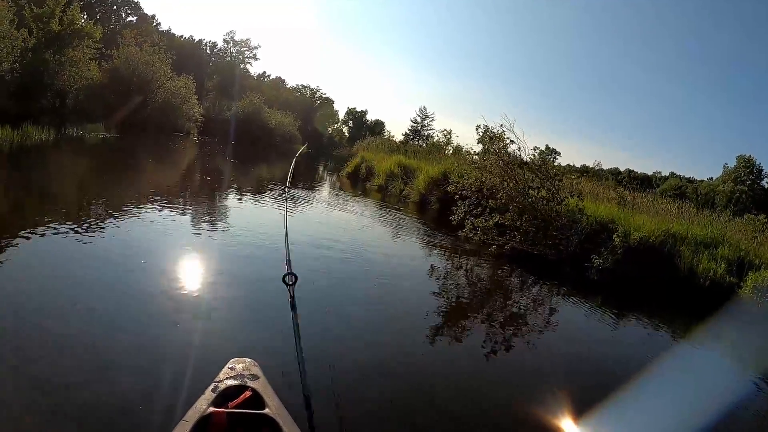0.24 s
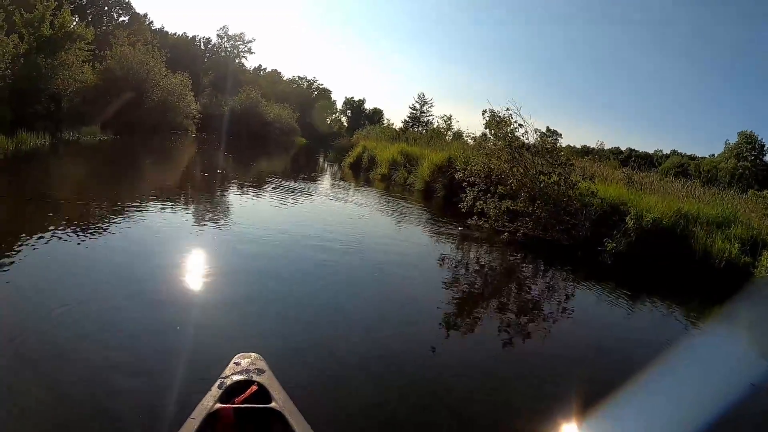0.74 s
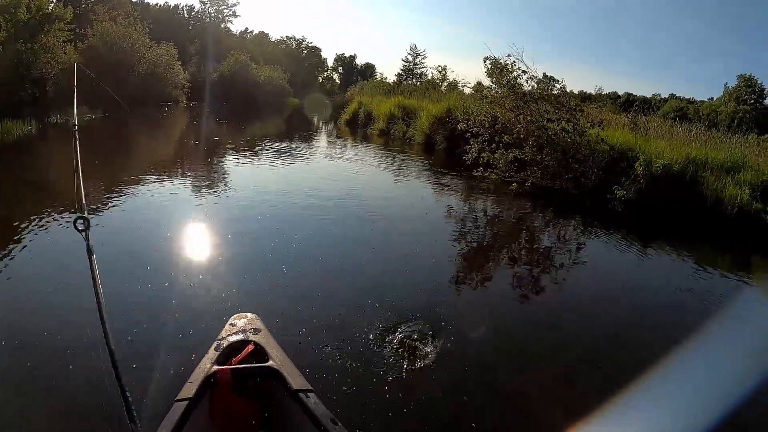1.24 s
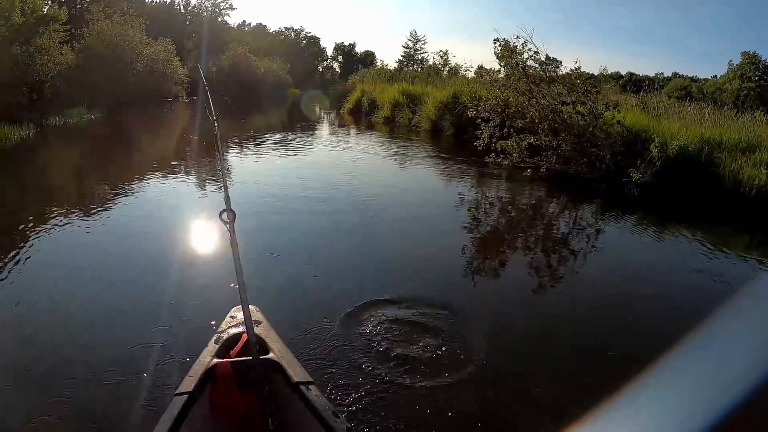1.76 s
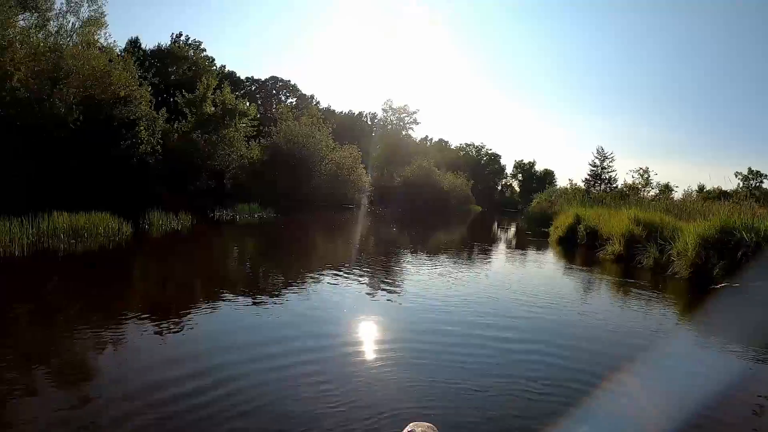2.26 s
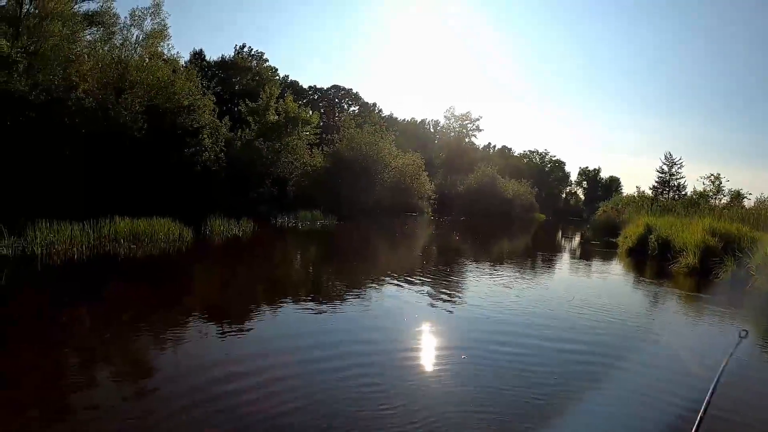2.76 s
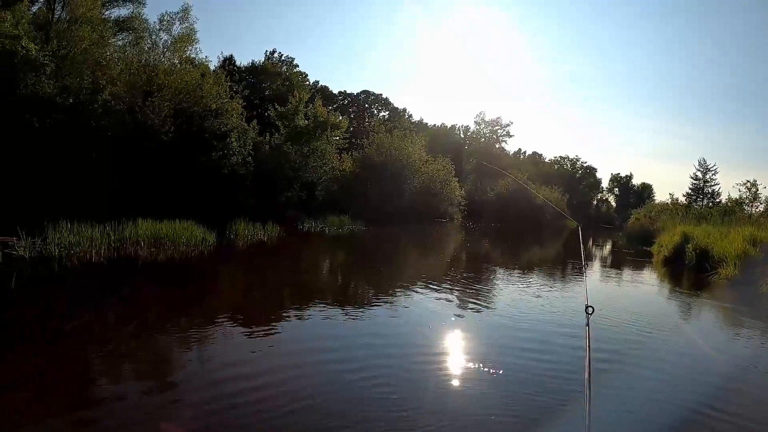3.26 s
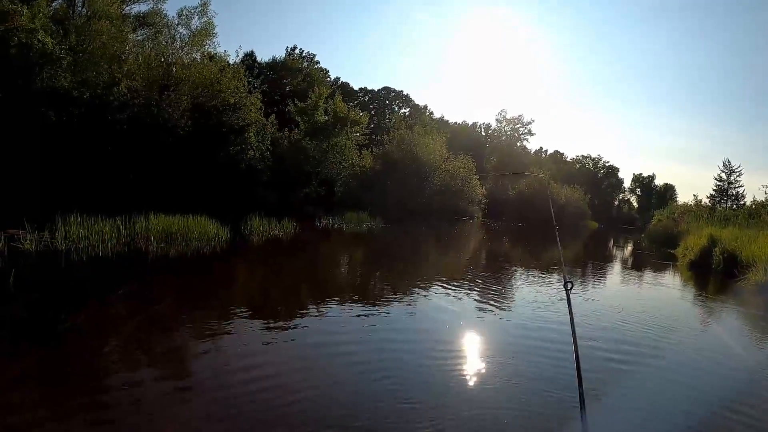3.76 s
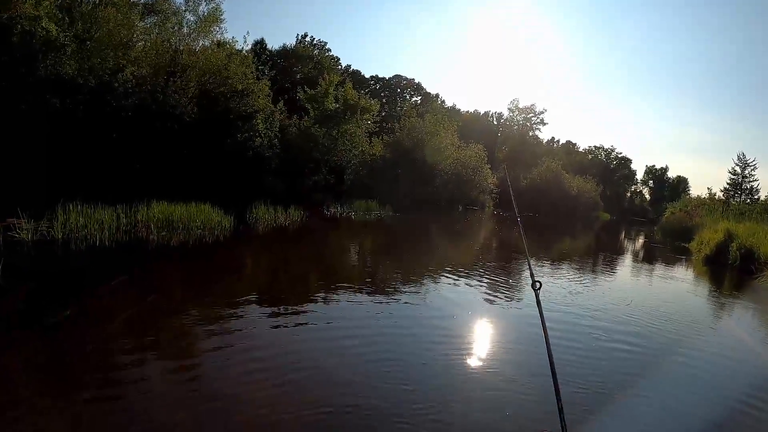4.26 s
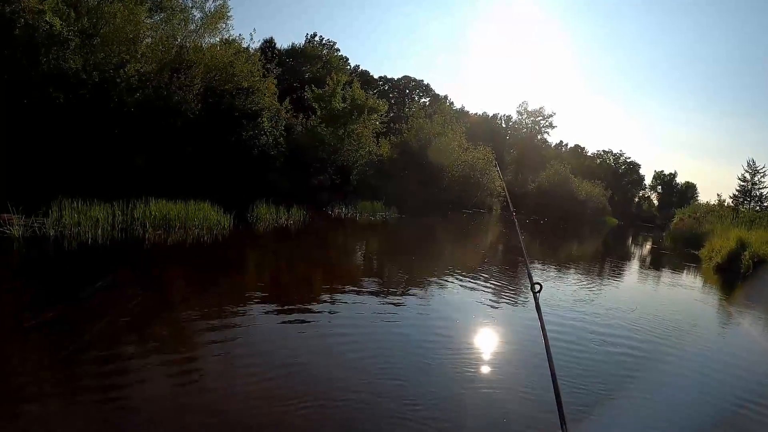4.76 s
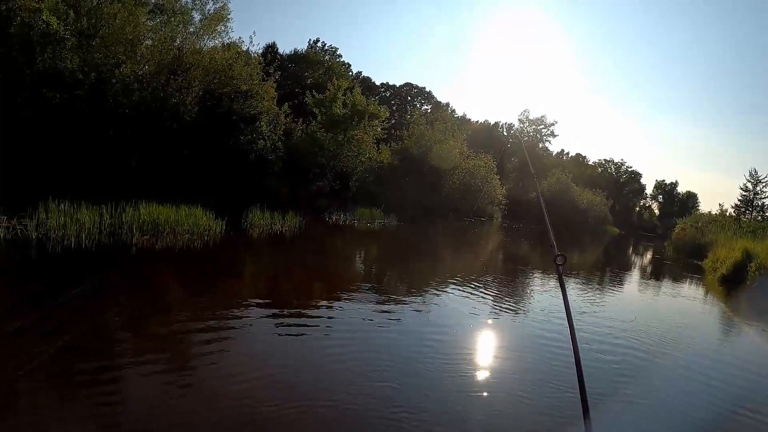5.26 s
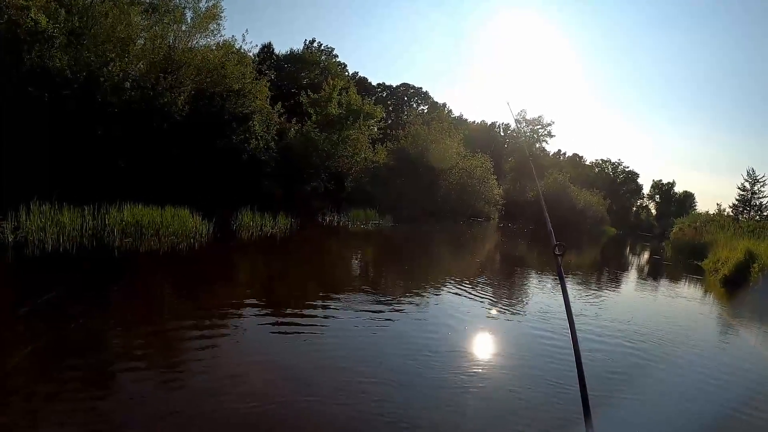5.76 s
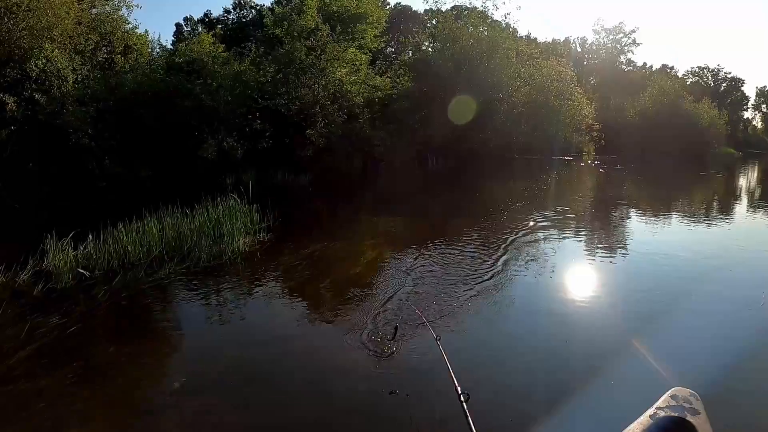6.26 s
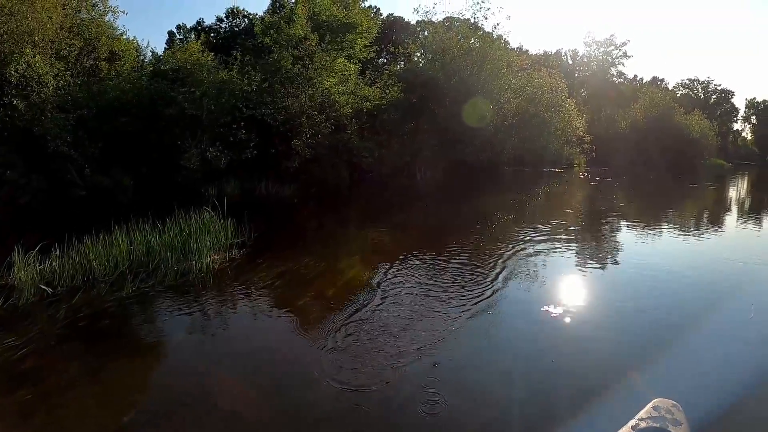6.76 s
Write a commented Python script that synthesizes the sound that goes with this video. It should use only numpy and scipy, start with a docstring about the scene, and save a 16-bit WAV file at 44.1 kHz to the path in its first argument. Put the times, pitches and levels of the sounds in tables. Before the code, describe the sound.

Light wind rumbles and buffets on a head-worn microphone throughout, with faint ripples lapping at a canoe on a quiet creek. A fishing reel whirrs softly for the first two seconds, with a click near 0.5 seconds. From 1 to 2.2 seconds a lure skitters across the water with small slaps, spray, drops and ringing bubbles. At 2.7 seconds the reel's bail clicks sharply open. Line hisses off the spool from 2.9 seconds with a brief hum and a thin whistle, fading by about 4. Dull, hollow knocks hit the hull at 2.9 and 3.3 seconds, with weaker ones at 3.7 and 4.5. The line squeaks briefly around 4.2 seconds, and the bail snaps shut at 4.6. Wet line then rubs faintly, with small ticks; soft winding returns at 6.3 seconds, and a last sharp snap comes at 6.9. Everything is close.

```python
"""A fishing reel and its lure, worked from a canoe on a still creek. Gears whirr and wet line rubs as
the lure skitters in, slapping up spray, drops and ringing bubbles. The sprung bail clicks open, line
hisses off the spool, the hull booms under a few dull knocks, the bail snaps shut and the reel whirrs
again. Ripples lap at the hull, and a light wind rumbles on the two ports of a head-worn microphone."""
import sys
import numpy as np
from scipy import signal
from scipy.fft import rfft, irfft, next_fast_len
from scipy.io import wavfile
from scipy.ndimage import uniform_filter1d

SR = 44100
rng = np.random.default_rng(int(sys.argv[2]) if len(sys.argv) > 2 else 0)


def dump(signal):
    """Clip the signal to [-1, 1] and save it as 16-bit WAV at the path in sys.argv[1]."""
    limited = np.clip(np.atleast_2d(signal).T, -1, 1)
    pcm = np.round(limited * 32767).astype(np.int16)
    wavfile.write(sys.argv[1], SR, pcm)


N = 309052
TIME = np.arange(N) / SR


# Spells of winding under load. Each row: start and end in seconds, level in dB.
WINDING = [(0.0, 0.44, -75.5), (0.392, 0.594, -59.5), (0.575, 2.222, -57.5), (4.663, 4.923, -63),
           (6.26, 6.407, -58), (6.415, 6.973, -65)]
# Tone of the gear whirr. Each row: frequency in Hz, level in dB.
WINDING_COLOUR = [(410, -12.5), (700, -7), (848, -10), (1070, 0.5), (1610, -4.5), (2310, -8.5), (2560, -9),
                  (2940, -8.5), (4270, -11.5), (4980, -14), (5380, -14), (7410, -24), (8210, -29.5),
                  (10900, -31), (15000, -42)]
# Thin whines of the gears. Each row: pitch and width in Hz, level in dB against the whirr.
GEAR_WHINES = [(1090, 93, -6), (5050, 160, -12)]
# Slack line drawn in through the rod rings. Each row: start and end in seconds, level in dB.
DRAWING = [(4.66, 5.11, -69.5), (5.064, 6.292, -64), (6.726, 7.01, -62), (6.955, 7.015, -44.5)]
# Tone of that rubbing line. Each row: frequency in Hz, level in dB.
DRAWING_COLOUR = [(710, -41), (1200, -6), (1480, -5), (1770, 0.5), (2080, -2), (3010, 3.5), (3490, 1),
                  (4300, -8.5), (5670, -6.5), (7470, -18), (8840, -13), (10300, -22.5), (15000, -27)]

def reel():
    """Gears whirr and wet line rubs, swelling with each turn of the rotor and as it tightens."""
    winding = together(from_db(db) * swell(start, end, attack=0.028, t60=0.16, sag_db_per_s=4.5)
                       for start, end, db in WINDING)
    drawing = together(from_db(db) * swell(start, end, attack=0.094, t60=0.3, sag_db_per_s=-2.5)
                       for start, end, db in DRAWING)
    whine = sum(from_db(db) * whistle(hz, width_hz) for hz, width_hz, db in GEAR_WHINES)
    whirr = restless(noise(WINDING_COLOUR, side_db=-18), depth_db=4.5, rate=30)
    gears = winding * (whirr + whine)
    rotor_db = 0.24 * np.sin(2 * np.pi * 4.5 * TIME)
    teeth_db = 1.5 * whistle(hz=210, width_hz=10)   # flutter of the meshing teeth
    light_load_whine = from_db(-10.5) * whistle(hz=3390, width_hz=130)
    flutter = from_db(rotor_db + 1.05 * drift(55) + teeth_db)
    line = drawing * flutter * (mono_noise(DRAWING_COLOUR) + light_load_whine)
    return gears * panned(5) + line


# Line leaving the spool: the cast, then a last pull.
# Each row: start and end in seconds, level in dB, run-up and run-down t60 in seconds.
RUNS = [(2.863, 3.476, -46.3, 0.2, 2), (4.112, 4.223, -52, 0.12, 0.25)]
# Tone of the line's hiss. Each row: frequency in Hz, level in dB.
HISS_COLOUR = [(530, -29), (900, -15), (1140, -8), (1590, -4.5), (2050, -4), (2500, 2), (3420, -2.5),
               (4390, -2.5), (5840, -12.5), (6650, -6), (8050, -15.5), (9070, -13.5), (10100, -18),
               (15500, -28)]
# Line squeaking on the spool lip. Each row: start and end in seconds, level in dB, pitch in Hz.
SQUEAKS = [(4.17, 4.29, -57, 3460), (4.18, 4.37, -63.5, 2770), (6.275, 6.31, -61, 2920),
           (6.278, 6.302, -55, 5090), (6.417, 6.526, -66, 2850), (6.77, 6.9, -62.5, 3020)]
# Hum that rises and sinks with the line's speed. Each row: time in seconds, pitch in Hz, level in dB.
LINE_HUM = [(2.94, 312, -80), (2.98, 340, -57), (3.01, 377, -50), (3.07, 412, -52), (3.12, 387, -54.5),
            (3.18, 378, -68), (3.3, 341, -66), (3.4, 330, -84)]
RING_WIDTH_HZ = 150

def cast():
    """Coils of line flick over the spool lip; the running line hums, squeaks and sings in the rings."""
    cast_s = RUNS[0][0]
    loose_coils = from_db(-65.5) * swell(cast_s, end=4.49, attack=0.073, t60=0.06)
    runs = [from_db(db) * swell(start, end, run_up, t60, sag_db_per_s=8.5)
            for start, end, db, run_up, t60 in RUNS]
    running = together([loose_coils] + runs)
    speed = running / running.max()
    lip_whirr = from_db(-2) * whistle(hz=2376 + 559 * speed, width_hz=280)
    second_ring = from_db(-19) * speed * whistle(9330, RING_WIDTH_HZ)
    hiss = running * from_db(1.1 * drift(130)) * (mono_noise(HISS_COLOUR) + lip_whirr + second_ring)
    # The main rod ring follows only a share of the hiss's swing.
    singing = swell(cast_s, end=4.36, attack=0.089, t60=0.3) * running ** 0.27
    main_ring = singing * from_db(-56.5 + 2.2 * drift(45)) * whistle(8780, RING_WIDTH_HZ)
    squeaks = sum(from_db(db) * swell(start, end, attack=0.027, t60=0.12) * whistle(hz, 0.036 * hz)
                  for start, end, db, hz in SQUEAKS)
    hum_hz, hum_db = in_time(LINE_HUM)
    humming = during(LINE_HUM) * from_db(hum_db + 2 * drift(25))
    wavering_hz = hum_hz * (1 + 0.013 * drift(47))
    hum = humming * np.sin(2 * np.pi * np.cumsum(wavering_hz) / SR)
    return hiss + main_ring + squeaks + hum


def last_pull():
    """Wet line sizzles on the spool lip and the rod rings sing out."""
    start, end = 4.13, 4.35
    sizzle = from_db(-70) * swell(start, end, attack=0.057, t60=0.087) * wet_line()
    rings = sum(from_db(db) * whistle(hz, RING_WIDTH_HZ)
                for hz, db in [(4900, -2), (9150, -1.5), (12050, -5)])
    return sizzle + from_db(-69) * swell(start, end, attack=0.04, t60=0.15) * rings


# Tone of the sizzle. Each row: frequency in Hz, level in dB.
SIZZLE_COLOUR = [(4500, -4), (7000, -8), (10500, -4), (12000, -1), (13000, -8), (15500, -14)]

def wet_line():
    """The bright sizzle of wet line sliding on the lip; rms 1."""
    return mono_noise(SIZZLE_COLOUR)


# Snaps of the bail. Each row: time in seconds, strike and rattle in dB, rattle t60 and rebound delay
# in seconds, rebound in dB, low-pass in Hz, pitch as a ratio to the closed bail.
SNAPS = [(2.6699, -16, -37, 0.062, 0.0032, -25, 11000, 1.035),
         (4.6265, -36, -44, 0.09, 0.0049, -39, 7000, 1.0),
         (4.6402, -19.5, -26.5, 0.04, 0.001973, -18, 15000, 1.034),
         (6.9355, -12.5, -30.5, 0.042, 0.0037, -24, 12500, 0.99)]
# Modes of the bail and reel body. Each row: pitch in Hz, level in dB, t60 in seconds.
BAIL_MODES = [(807, -25, 0.014), (1926, -2, 0.0096), (3306, 0, 0.0067), (3950, -5.5, 0.01),
              (4960, -3, 0.007), (5460, -8, 0.014), (6440, -8.5, 0.0093), (7050, -8, 0.0055),
              (9120, -7.5, 0.0074)]
# Tone of the rattle. Each row: frequency in Hz, level in dB.
RATTLE_COLOUR = [(300, -20.5), (900, -18.5), (1300, -13), (1900, -3.5), (2700, -5), (4300, -5), (6700, -5),
                 (9000, -10), (12000, -17.5), (16000, -34)]
# The wire ringing on its way to the stop. Each row: start and stop in seconds, level in dB, pitch in Hz.
SWINGS = [(2.647, 2.67, -42, 5180), (2.652, 2.669, -42, 3700), (4.618, 4.642, -37, 6500)]

def bail():
    """The sprung wire swings over ringing, cracks against its stop, rebounds and rattles briefly."""
    out, t = np.zeros((2, N)), TIME[:SR // 2]
    ringing = rms_one(sum(from_db(db) * whistle(hz, width_hz=60) for hz, db, _ in BAIL_MODES))
    rattle = from_db(2.5) * noise(RATTLE_COLOUR, side_db=-1) + from_db(-7) * ringing
    for k, (s, strike_db, rattle_db, t60, rebound_s, rebound_db, top_hz, pitch) in enumerate(SNAPS):
        strike = sum((-1) ** m * from_db(db) * mode(hz * pitch, mode_t60)
                     for m, (hz, db, mode_t60) in enumerate(BAIL_MODES))
        rebound = from_db(rebound_db) * np.roll(strike, int(rebound_s * SR))
        crack = from_db(strike_db - 7.5) * decay(t, t60=0.003) * rng.standard_normal(len(t))
        shake = np.minimum(t / rebound_s, 1) * decay(np.maximum(t - rebound_s, 0), t60)
        tail = from_db(rattle_db) * shake * rattle[:, k * len(t):(k + 1) * len(t)]
        snap = from_db(strike_db) * strike + rebound + crack + tail
        add(out, s, filtered(snap, top_hz, order=1))
    swings = sum(from_db(db) * swell(start, stop, stop - start, t60=0.061) * whistle(hz, width_hz=130)
                 for start, stop, db, hz in SWINGS)
    return out + swings


# Ticks of the tackle. Each row: time in seconds, level in dB, t60 in seconds, centre in Hz.
TICKS = [(0.452, -48, 0.28, 3530), (0.4705, -31.5, 0.016, 3800), (0.473, -32, 0.016, 1500),
         (0.485, -43, 0.03, 4400), (0.509, -54.5, 0.064, 6000), (0.538, -55.5, 0.068, 8000),
         (0.716, -50.5, 0.0093, 5960), (0.887, -52, 0.016, 11500), (2.381, -56.5, 0.028, 4470),
         (2.443, -60.5, 0.079, 4900), (2.71, -58.5, 0.74, 4150), (2.917, -46, 0.21, 3500),
         (2.925, -56.5, 0.68, 10400), (3.409, -39.5, 0.045, 6500), (3.487, -42, 0.085, 3620),
         (4.2128, -38.5, 0.055, 4870), (4.389, -54.5, 0.061, 5040), (4.4443, -45.5, 0.071, 4560),
         (4.462, -43, 0.037, 1370), (4.476, -46, 0.086, 3330), (4.69, -50, 0.023, 3160),
         (4.8155, -43.5, 0.016, 2780), (6.1494, -36, 0.0094, 2600), (6.332, -55, 0.026, 4870),
         (6.834, -50, 0.016, 3400)]

def ticks():
    """Small contacts in the tackle give gritty clicks."""
    return bursts(TICKS, width=0.27, reach=2.3, attack=0.0011)


# Slaps and gulps of the lure. Each row: time in seconds, level in dB, t60 in seconds, centre in Hz.
SPLASHES = [(0.984, -44.5, 0.066, 3160), (0.9905, -37, 0.021, 2000), (1.074, -42, 0.14, 5960),
            (1.082, -25, 0.02, 1750), (1.089, -24, 0.02, 2200), (1.095, -34.5, 0.057, 1300),
            (1.097, -39.5, 0.092, 6550), (1.1026, -34.5, 0.053, 2300), (1.117, -34.5, 0.026, 2100),
            (1.155, -48, 0.16, 1690), (1.338, -40.5, 0.15, 1140), (1.339, -35, 0.04, 3800),
            (1.365, -33, 0.045, 2700), (1.367, -30.5, 0.053, 1450), (1.372, -40, 0.038, 670),
            (1.52, -39.5, 0.025, 2380), (1.605, -38.5, 0.047, 2870), (1.7603, -31, 0.014, 3280),
            (1.768, -37.5, 0.024, 2000), (2.011, -36.5, 0.038, 2010), (2.1505, -37, 0.025, 2940)]
# Single drops falling back. Each row: time in seconds, relative level in dB, centre in Hz.
DROPS = [(1.0736, -33, 6500), (1.098, -30, 6840), (1.104, -28.5, 7000), (1.108, -32, 7500),
         (1.145, -40, 4000), (1.1854, -42, 3500), (1.2225, -43, 5000), (1.2672, -37.5, 9000),
         (1.324, -34, 3740), (1.341, -39, 5500), (1.3718, -25, 4170), (1.441, -41, 5000),
         (1.5108, -35.5, 3700), (1.628, -39, 5730), (1.657, -35, 3700), (1.732, -40, 3300),
         (1.862, -41, 4200), (1.879, -38.5, 4600), (1.9073, -34, 3470), (1.9356, -43.5, 4500),
         (2.005, -41, 4560), (2.12, -43, 6200), (2.219, -41, 3940)]
# Trapped bubbles. Each row: time in seconds, level in dB, pitch in Hz, t60 in seconds,
# rise in octaves per second.
BUBBLES = [(1.0968, -29, 1110, 0.062, -10), (1.138, -39, 755, 0.05, -6), (1.173, -39, 1370, 0.03, -2),
           (1.3403, -24, 2380, 0.015, 9), (1.3803, -17.5, 1308, 0.033, -7), (1.395, -34.5, 1185, 0.06, 10),
           (1.408, -34, 2750, 0.016, -6), (1.511, -39.5, 975, 0.12, 5), (1.761, -25, 2900, 0.014, -4),
           (2.012, -27, 1900, 0.021, -2)]
# The jerking line makes a rod ring tink. Each row: time in seconds, level in dB.
TINKS = [(1.387, -49), (1.409, -44), (1.629, -49), (1.658, -44)]
LURE_FROM_S, LURE_TO_S, TINK_HZ = 0.98, 2.24, 9030

def lure():
    """The skittering lure slaps up spray, drops fall back, bubbles ring and the taut line sings."""
    skitter = swell(LURE_FROM_S, LURE_TO_S, attack=0.0052, t60=0.052)
    wake = from_db(-51) * skitter
    thrown = [from_db(db - 20) * swell(s, s, attack=0.0055, t60=1) for s, db, _, _ in SPLASHES]
    wetness = together([wake] + thrown) * swell(0, LURE_TO_S, attack=0.02, t60=0.03)
    droplets = wetness * spray() * panned(3.1)
    out = bursts(SPLASHES, width=0.14, reach=2.7, attack=0.00044)
    drops = bursts([(s, db, 0.0071, hz) for s, db, hz in DROPS], width=0.42, reach=2.5, attack=0.00074)
    out += from_db(4) * filtered(drops, hz=10500, order=2)
    wobble = from_db(3 * drift(70))
    onset = 1 - np.exp(-TIME[:SR // 2] / 0.0016)
    for s, db, hz, t60, rise in BUBBLES:
        add(out, s, from_db(db) * mode(hz, t60, rise) * onset * wobble[int(s * SR):][:SR // 2])
    for s, db in TINKS:
        add(out, s, from_db(db) * mode(TINK_HZ, t60=0.04))
    taut_line = from_db(-78 + 3.1 * drift(9)) * skitter * whistle(TINK_HZ, 2 * RING_WIDTH_HZ)
    return out + droplets + taut_line


# Tone of the spray. Each row: frequency in Hz, level in dB.
SPRAY_COLOUR = [(190, -56), (330, -11), (580, -14), (854, -13), (1140, -10.5), (1280, -8), (1500, -6.5),
                (2390, -3), (4560, -9.5), (5350, -15), (8010, -21), (9110, -29), (10000, -31), (12800, -31),
                (15500, -51)]

def spray(drops_per_s=600, tick_s=0.00074):
    """Fine droplets land in uneven handfuls: short dry ticks and plinks over a shifting fizz."""
    fizz = restless(noise(SPRAY_COLOUR, side_db=-12), depth_db=4, rate=27)
    handfuls = from_db(1.26 * drift(19))
    sizes = from_db(4.3 * np.minimum(rng.exponential(1, N), 3.5))
    landings = sizes * (rng.random(N) < drops_per_s / SR)
    tails = signal.lfilter([1], [1, -np.exp(-1 / (tick_s * SR))], landings + 1e-18)
    spatter = coloured(tails * rng.standard_normal(N), SPRAY_COLOUR)
    return handfuls * (from_db(-6.5) * spatter + from_db(-4.5) * fizz) + plinks()


def plinks(per_s=55, low_hz=1300, high_hz=4800, cycles=57):
    """Some droplets trap a tiny bubble that rings briefly, rising in pitch."""
    out, span = np.zeros(N), LURE_TO_S - LURE_FROM_S
    for when, pitch, strength in rng.random((int(per_s * span), 3)):
        hz = low_hz * (high_hz / low_hz) ** pitch
        db = 3 + 4 * (2 * strength - 1)
        add(out, LURE_FROM_S + when * span, from_db(db) * mode(hz, t60=cycles / hz, rise=5))
    return out


# Tone of line dragged through water. Each row: frequency in Hz, level in dB.
SWISH_COLOUR = [(450, -5), (800, -8), (1100, -3), (1600, -2), (2400, 2), (3300, -8), (5000, -9),
                (8000, -23), (14000, -26)]

def swish():
    """Taut line cuts the water, swelling with the swing of the rod before the lure surfaces."""
    swing = swell(start=0.718, end=0.918, attack=0.22, t60=0.85) ** 2
    return from_db(-54.5 + 2.6 * drift(29)) * swing * noise(SWISH_COLOUR, side_db=-12) * panned(3)


# Knocks on the hull. Each row: time in seconds, level in dB, extra low boom in dB.
KNOCKS = [(2.889, -2, -1.5), (2.927, -11.5, -1.5), (3.335, -2, -3), (3.746, -17.5, 3.5),
          (4.4604, -7.5, -14)]
# Hull modes, each answering after its own short lag. # Each row: pitch in Hz, level in dB, t60 and lag in
# seconds.
HULL_MODES = [(780, -23.5, 0.029, 0.00097), (704, -33, 0.065, 0.004), (1560, -42, 0.015, 0.003),
              (513, -36.5, 0.11, 0.012), (310, -34, 0.2, 0.00497), (217, -29.5, 0.11, 0.0011),
              (144, -23.5, 0.102, 0.0006)]

def hull():
    """Dull blows ring the hull's modes over a short hollow rumble."""
    out, shake, t = np.zeros(N), np.zeros(N), TIME[:SR // 2]
    contact = 1 - np.exp(-t / 0.0021)   # a dull blow builds up gradually
    for s, db, boom_db in KNOCKS:
        for hz, mode_db, t60, lag in HULL_MODES:
            level = from_db(db + mode_db + boom_db * (hz < 600) + rng.normal(0, 1.5))
            add(out, s + lag, level * mode(hz, t60) * contact)
        add(shake, s, from_db(db + boom_db) * contact * decay(t, t60=0.28))
    rumble = mono_noise([(90, 1), (200, 10.5), (550, -4.5), (900, -8.5), (1600, -8.5)])
    return out + from_db(-34.5) * shake * rumble


# Brief drops in the breeze. Each row: time in seconds, depth in dB, half length in seconds.
LULLS = [(0.17, 9, 0.027), (1.7, 6, 0.081), (3.199, 1.5, 0.34), (3.492, 17, 0.038), (4.59, 18, 0.071)]
# Gusts on the ports. Each row: start and end in seconds, level in dB, left over right in dB.
GUSTS = [(0.239, 0.386, -33.5, 13), (0.428, 0.67, -41, 14), (1.466, 1.518, -46, 14),
         (1.792, 1.949, -31, 13), (2.237, 2.285, -27.5, 2), (2.458, 2.627, -33.5, 0), (2.753, 2.88, -36, 9),
         (3.525, 3.783, -43.5, -9), (4.113, 4.183, -34.5, -7), (4.796, 5.076, -50, 6),
         (6.087, 6.453, -42, 6.5)]
# Tone of the wind rumble. Each row: frequency in Hz, level in dB.
RUMBLE_COLOUR = [(11, -27), (18, -3), (38, 4.5), (81, -0.5), (141, -10.5), (167, -18), (226, -20),
                 (334, -35), (500, -45.5), (650, -66.5), (1100, -120)]
# The hardest pressure buffets. Each row: time in seconds, peak in dB, pitch in Hz.
BUFFETS = [(0.283, -26.5, 73.5), (0.321, -33.5, 177), (0.645, -26.5, 74), (1.886, -29, 133),
           (1.944, -21, 116), (2.022, -24, 57.6), (2.256, -22.5, 119), (2.284, -20.5, 102),
           (2.528, -22, 48.6), (4.16, -31, 130), (4.176, -29, 115), (4.998, -38, 164)]

def wind():
    """An easing breeze and its gusts rumble and buffet, stronger on the windward port."""
    lull_db = sum(db * np.exp(-((TIME - s) / half) ** 2) for s, db, half in LULLS)
    breeze = from_db(-46.5 - 0.69 * TIME - lull_db) * panned(1.5)
    gusts = [from_db(db) * swell(start, end, attack=0.028, t60=0.51) * panned(pan_db)
             for start, end, db, pan_db in GUSTS]
    force = together([breeze] + gusts)
    out = force * evened(noise(RUMBLE_COLOUR, side_db=-2), span_s=0.082)
    windward = force / force.mean(axis=0)
    for s, db, hz in BUFFETS:
        near = np.abs(TIME - s) < 0.1
        cycles = (TIME[near] - s) * hz
        thump = np.cos(2 * np.pi * cycles) * np.exp(-(cycles / 0.55) ** 2)
        out[:, near] += from_db(db) * windward[:, near] * thump
    return out


# Tone of ripples on the hull. Each row: frequency in Hz, level in dB.
LAPPING_COLOUR = [(70, -53.5), (130, 3.5), (220, 0.5), (300, -14), (420, -25), (700, -25)]

def lapping():
    """Ripples slosh softly against the hollow hull, slowly growing louder."""
    return from_db(-62 + 0.71 * TIME + 3 * drift(6.6)) * noise(LAPPING_COLOUR, side_db=-26)


# Tone of the wash. Each row: frequency in Hz, level in dB.
WASH_COLOUR = [(350, -1.5), (650, -12), (1000, 1), (1350, -10), (2000, -24)]

def wash():
    """Water washes softly along the hull as the canoe swings round."""
    turning = swell(start=6.28, end=TIME[-1], attack=0.03, t60=0.1)
    return from_db(-65.5 + 2 * drift(11)) * turning * noise(WASH_COLOUR, side_db=-12)


# Tone of the open air. Each row: frequency in Hz, level in dB.
AIR_COLOUR = [(150, -2.5), (300, 7), (550, 0), (800, 0.5), (1100, 3), (1600, 1), (2500, -6), (5000, -10),
              (7500, -16.5), (10000, -29), (15000, -41)]

def creek_air():
    """A quiet, faintly wavering bed of air over the creek."""
    return from_db(-64.5 + drift(21)) * noise(AIR_COLOUR, side_db=-3.5) * panned(1)


# Lead of the right port for sounds from the rod side. Each row: frequency in Hz, phase in radians.
PORT_PHASE = [(200, 0.088), (1000, 0.64), (2000, 0.75), (5000, 1.33), (12000, 2.41)]

def from_the_right(x):
    """The sound reaches the right port a little before the left."""
    size = next_fast_len(N)
    phase = np.interp(np.arange(size // 2 + 1) * SR / size, *np.transpose(PORT_PHASE))
    return irfft(rfft(x, size) * np.exp(0.5j * phase * [[-1], [1]]), size)[:, :N]


def bursts(rows, width, reach, attack):
    """Each contact is a dying cluster of tiny impacts, rolled off beyond reach times off its centre."""
    out, t = np.zeros(N), TIME[:SR // 4]
    for s, db, t60, hz in rows:
        core = [hz / (1 + width), min(hz * (1 + width), 0.4 * SR)]
        skirts = [hz / reach, min(hz * reach, SR / 2.2)]
        grit = filtered(rng.standard_normal(len(t)), core, order=1, kind="band")
        fade = decay(t, t60)
        burst = rms_one(grit * fade * (1 - np.exp(-t / attack))) * np.sqrt(np.mean(fade ** 2))
        add(out, s, from_db(db) * filtered(burst, skirts, order=2, kind="band"))
    return out


def mode(hz, t60, rise=0):
    """A dying sine whose pitch may glide, in octaves per second."""
    t = TIME[:SR // 2]
    return np.sin(2 * np.pi * np.cumsum(hz * 2 ** (rise * t)) / SR) * decay(t, t60)


def whistle(hz, width_hz):
    """Noise in a narrow resonance whose centre may move; rms 1."""
    phase = 2 * np.pi * np.cumsum(hz * np.ones(N)) / SR
    return drift(width_hz) * np.cos(phase) + drift(width_hz) * np.sin(phase)


def noise(spectrum, side_db):
    """Stereo noise: a part common to both ports and a part that differs."""
    mid, side = coloured(rng.standard_normal((2, N)), spectrum)
    return mid + from_db(side_db) * side * [[1], [-1]]


def mono_noise(spectrum):
    """Noise from one point, alike at both ports; rms 1."""
    return coloured(rng.standard_normal(N), spectrum)


def coloured(x, spectrum):
    """Shape a signal by (Hz, dB) points, rolling off beyond both ends; rms 1."""
    hz, db = np.transpose(spectrum)
    size = next_fast_len(N)
    log_hz = np.log(np.maximum(np.arange(size // 2 + 1) * SR / size, 1))
    outside = np.abs(log_hz - np.clip(log_hz, np.log(hz[0]), np.log(hz[-1])))
    gain = from_db(np.interp(log_hz, np.log(hz), db) - 40 * outside)
    return rms_one(irfft(rfft(x, size) * gain, size)[..., :N])


def filtered(x, hz, order, kind="low"):
    """A gentle low-pass or band-pass."""
    return signal.sosfilt(signal.butter(order, hz, kind, fs=SR, output="sos"), x + 1e-18)


def restless(x, depth_db, rate):
    """Bands split at half octaves swell and fade on their own, so the colour keeps shifting."""
    out, rest = 0, x
    for hz in 1000 * 2 ** (np.arange(8) / 2):
        band = signal.sosfiltfilt(signal.butter(4, hz, fs=SR, output="sos"), rest)
        out = out + band * from_db(depth_db * drift(rate))
        rest = rest - band
    return rms_one(out + rest)


def evened(x, span_s):
    """Hold the level of a stereo noise steady over a span."""
    power = uniform_filter1d(np.mean(x ** 2, axis=0), max(int(span_s * SR), 2))
    return x / np.sqrt(power + 1e-9)


def drift(rate):
    """A smooth random wander up to about rate Hz; spread 1."""
    step, settle = 40, 2000
    pole = np.exp(-2 * np.pi * step * rate / SR)
    chance = rng.standard_normal(N // step + settle + 2)
    slow = signal.lfilter([1], [1, -2 * pole, pole * pole], chance)[settle:]
    return np.interp(np.arange(N) / step, np.arange(len(slow)), rms_one(slow))


def swell(start, end, attack, t60, sag_db_per_s=0):
    """A gain that rises over the attack, sags while held and dies after the end; times in seconds."""
    held = np.clip(TIME - start, 0, max(end - start, 0))
    rise = np.clip((TIME - start) / max(attack, 1e-3), 0, 1)
    release = np.exp(-np.minimum(np.log(1000) * np.maximum(TIME - end, 0) / t60, 20))
    return rise * from_db(-sag_db_per_s * held) * release


def decay(t, t60):
    """A gain that falls 60 dB in t60 seconds."""
    return np.exp(-np.log(1000) * t / t60)


def in_time(rows):
    """The columns of a curve at every sample."""
    s, *columns = np.transpose(rows)
    return [np.interp(TIME, s, c) for c in columns]


def during(rows):
    """One between a curve's first and last point, zero outside."""
    return (TIME >= rows[0][0]) & (TIME <= rows[-1][0])


def together(gains):
    """Gains of unrelated sounds add in power."""
    return np.sqrt(sum(g ** 2 for g in gains))


def panned(pan_db):
    """Left and right gains with mean 1, the left louder by pan_db."""
    left = from_db(np.atleast_1d(pan_db))
    return 2 * np.array([left, np.ones_like(left)]) / (1 + left)


def add(track, s, sound):
    """Mix a sound into a track from time s on."""
    at = int(np.clip(s * SR, 0, N - 1))
    track[..., at:at + sound.shape[-1]] += sound[..., :N - at]


def from_db(db):
    """Decibels to gain."""
    return 10 ** (np.asarray(db) / 20)


def rms_one(x):
    """Scale to unit rms."""
    return x / np.sqrt(np.mean(x ** 2) + 1e-20)


def scene():
    """Everything is close by, in the open air; the tackle sounds a little louder at the left port but reaches
    the right port first."""
    air = creek_air()
    tackle = reel() + cast() + last_pull() + bail() + ticks()
    return wind() + lapping() + wash() + hull() + from_the_right(air + swish() + lure() + tackle)


def record(dry):
    """The two ports are summed to mono for a stretch; the treble is cut above 16 kHz."""
    mono_from_s, mono_to_s = 2.245, 6.27
    mono = uniform_filter1d(1.0 * ((TIME > mono_from_s) & (TIME < mono_to_s)), size=400)
    mixed = dry + mono * (dry.mean(axis=0) - dry)
    return signal.sosfilt(signal.ellip(10, 0.1, 80, 16000, fs=SR, output="sos"), mixed)


dry = scene()
out = record(dry)
dump(out)
```